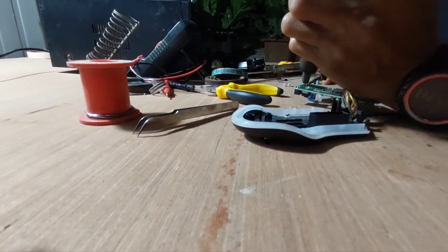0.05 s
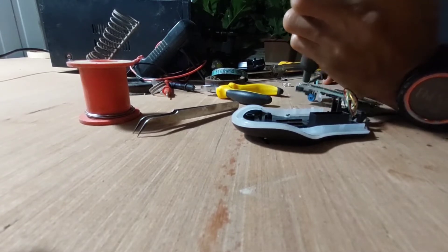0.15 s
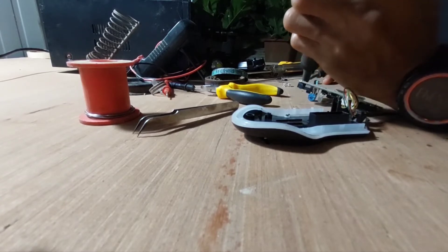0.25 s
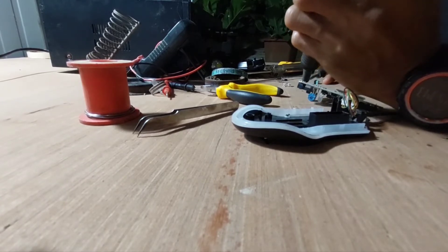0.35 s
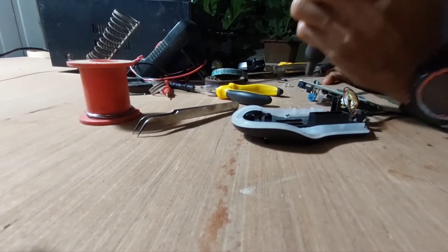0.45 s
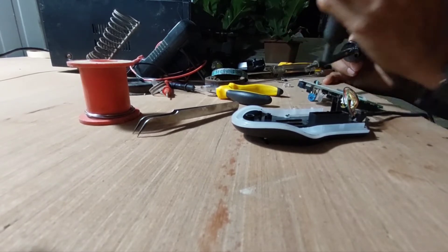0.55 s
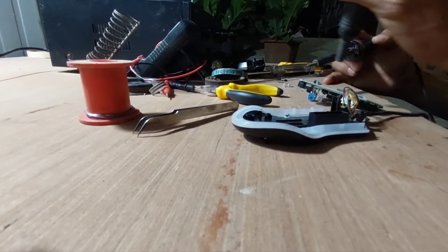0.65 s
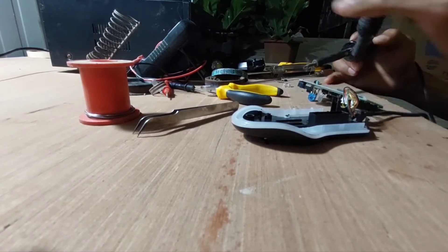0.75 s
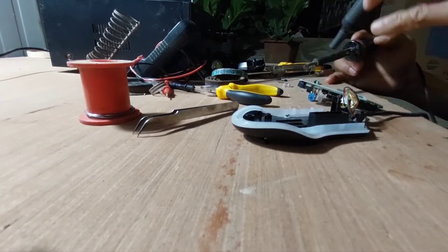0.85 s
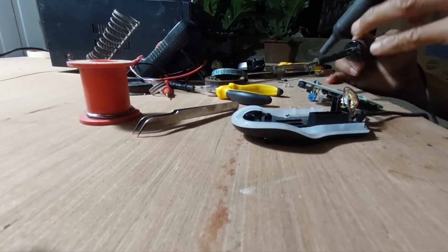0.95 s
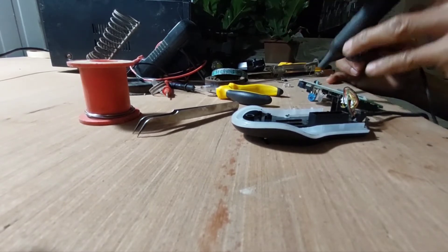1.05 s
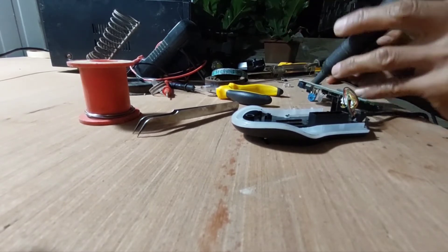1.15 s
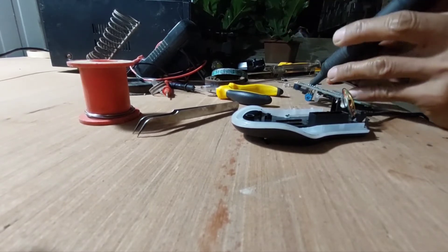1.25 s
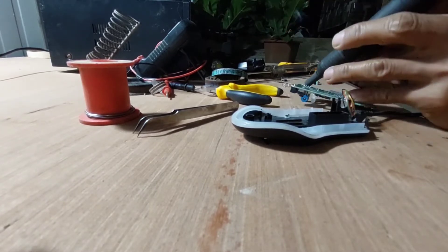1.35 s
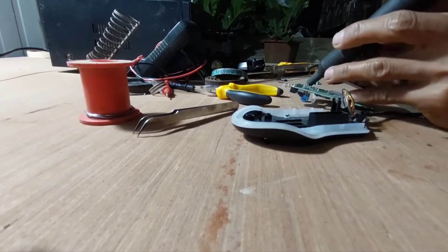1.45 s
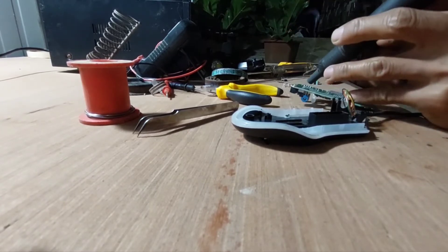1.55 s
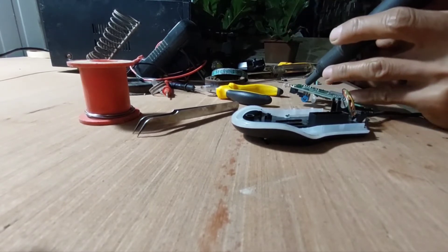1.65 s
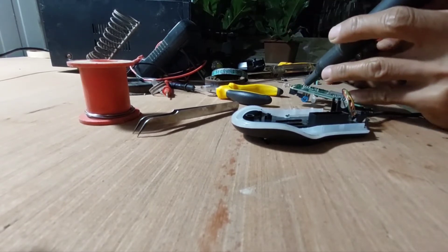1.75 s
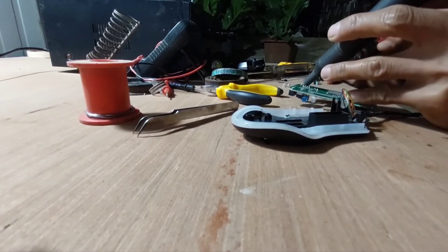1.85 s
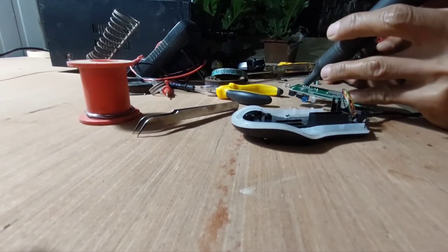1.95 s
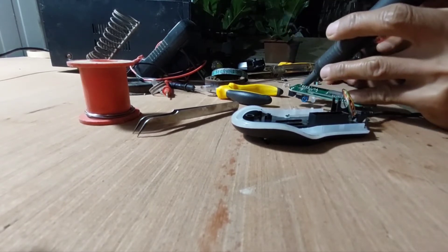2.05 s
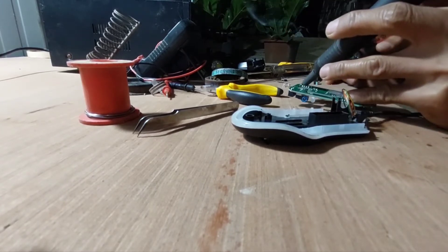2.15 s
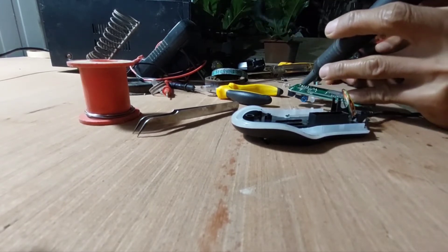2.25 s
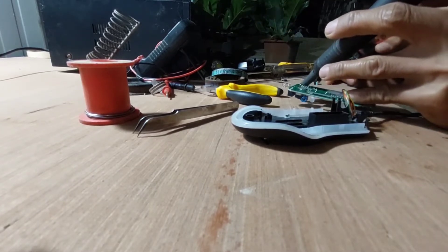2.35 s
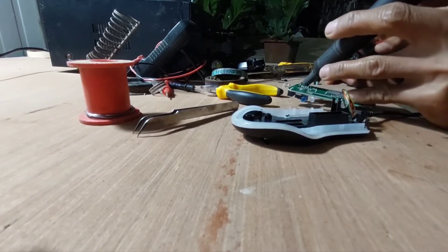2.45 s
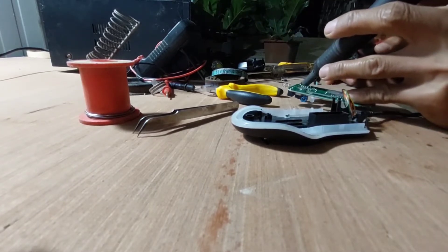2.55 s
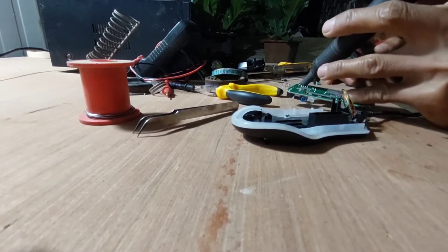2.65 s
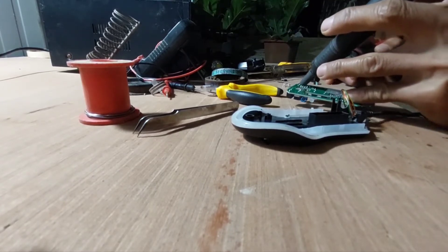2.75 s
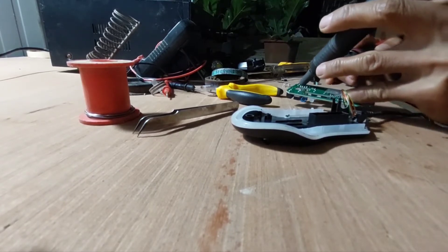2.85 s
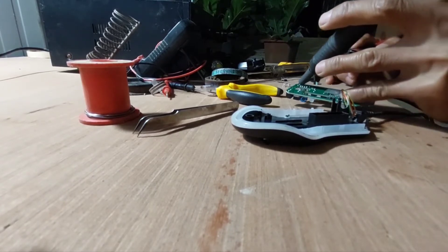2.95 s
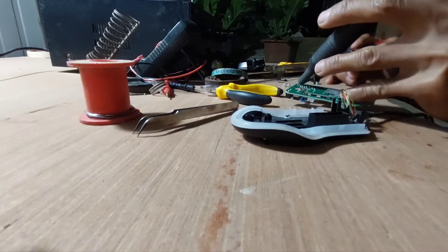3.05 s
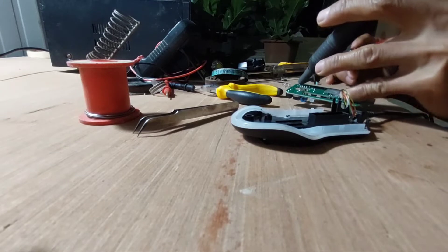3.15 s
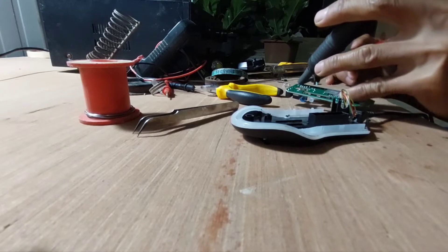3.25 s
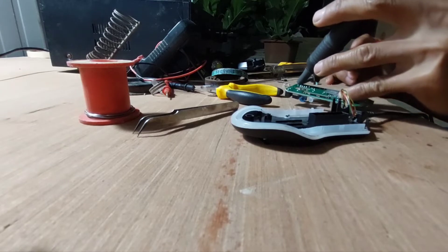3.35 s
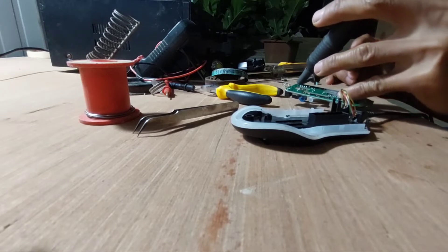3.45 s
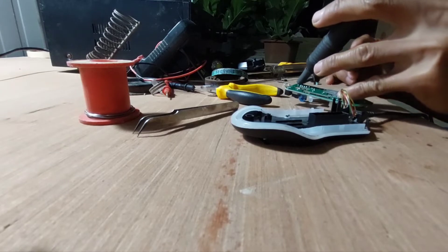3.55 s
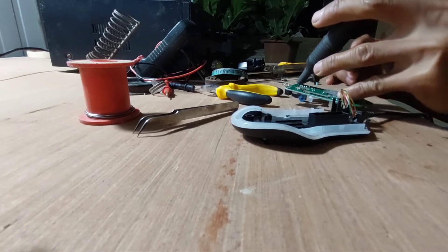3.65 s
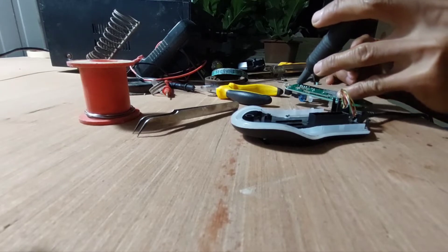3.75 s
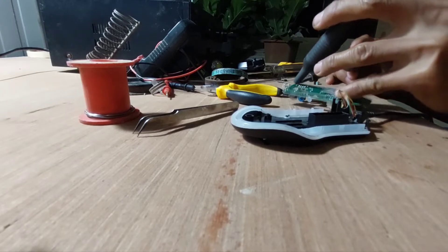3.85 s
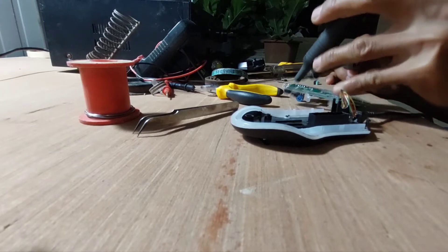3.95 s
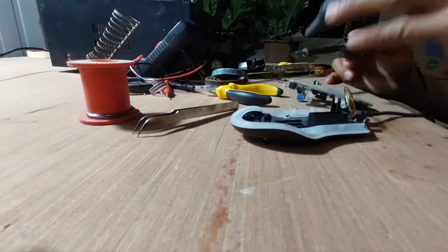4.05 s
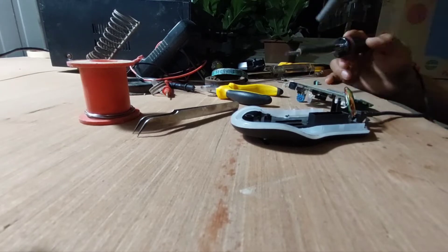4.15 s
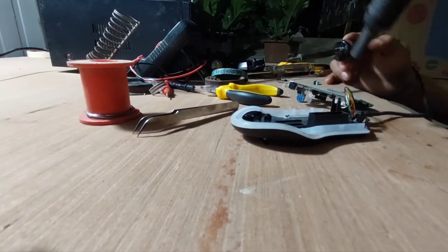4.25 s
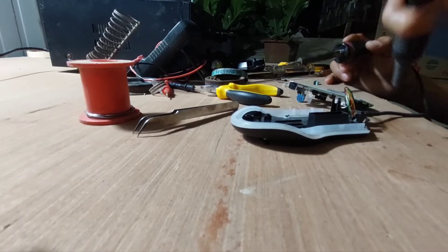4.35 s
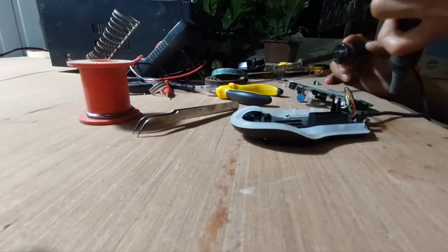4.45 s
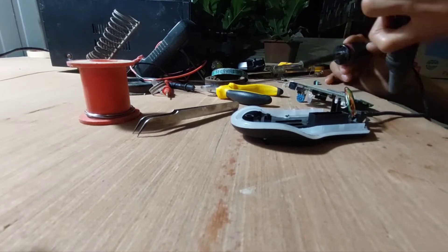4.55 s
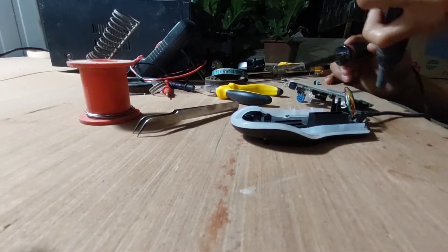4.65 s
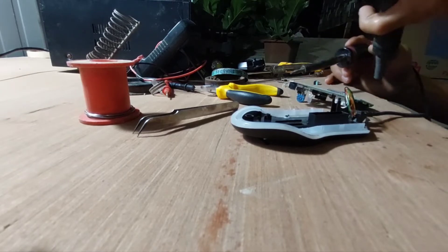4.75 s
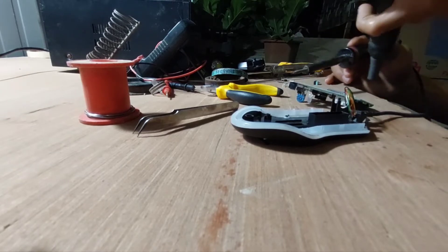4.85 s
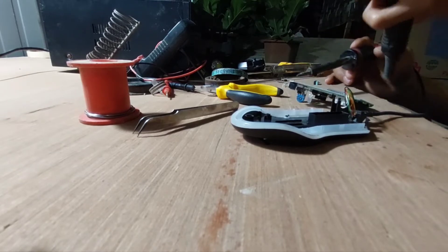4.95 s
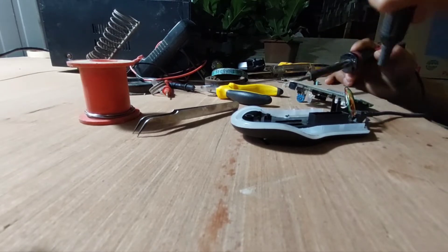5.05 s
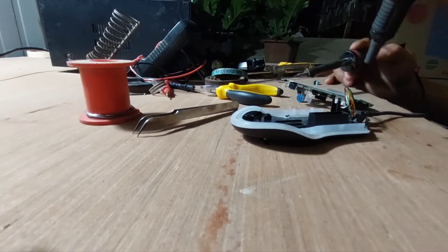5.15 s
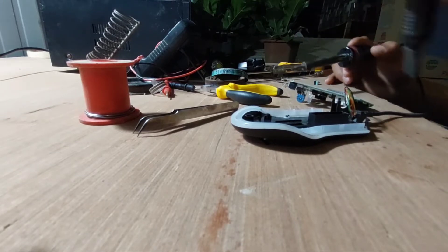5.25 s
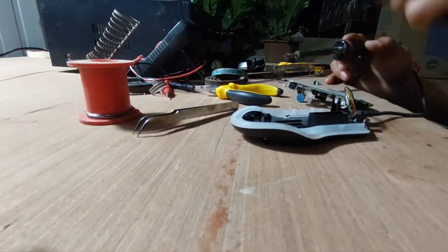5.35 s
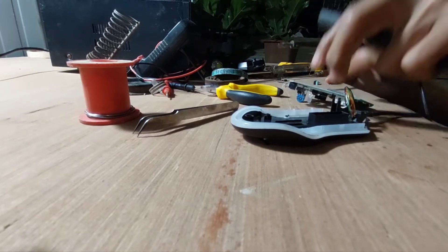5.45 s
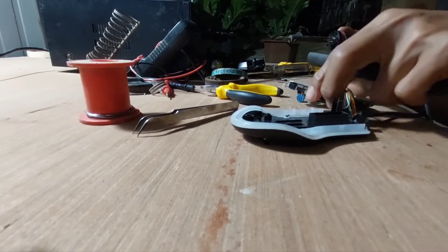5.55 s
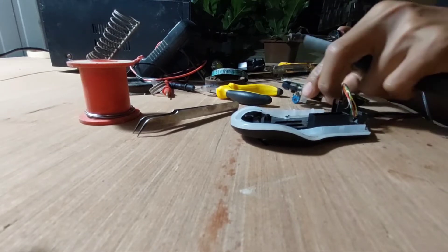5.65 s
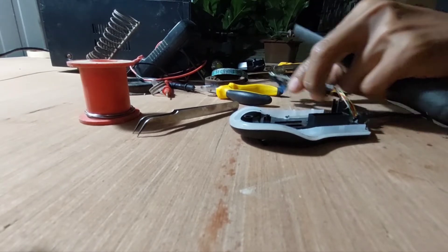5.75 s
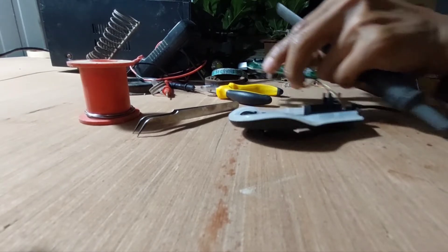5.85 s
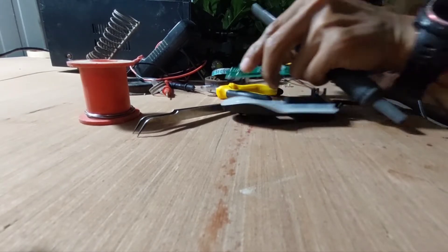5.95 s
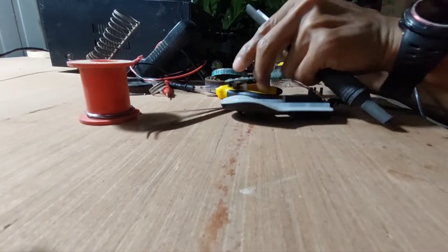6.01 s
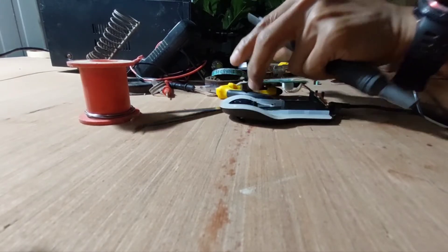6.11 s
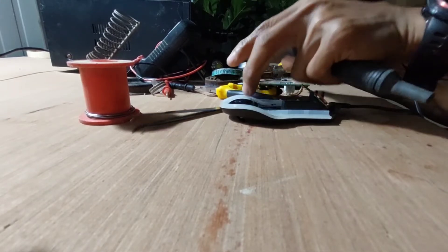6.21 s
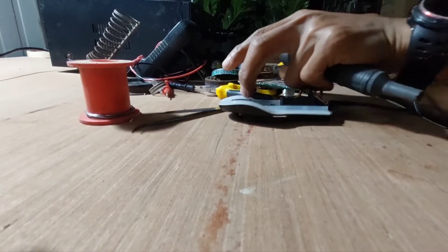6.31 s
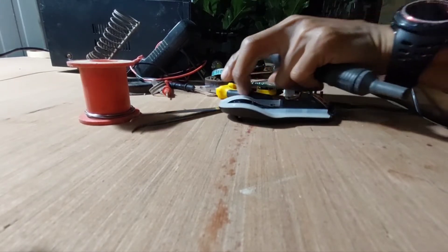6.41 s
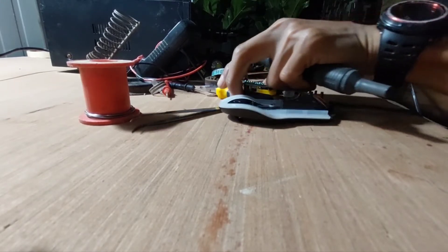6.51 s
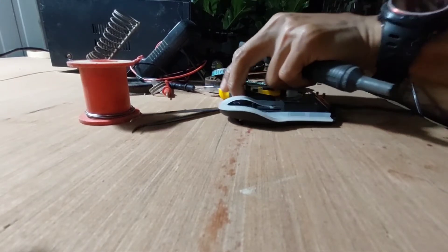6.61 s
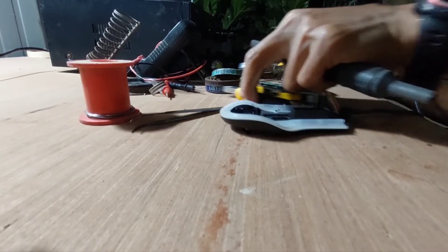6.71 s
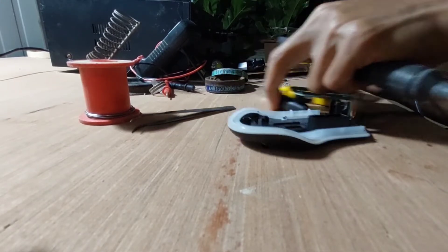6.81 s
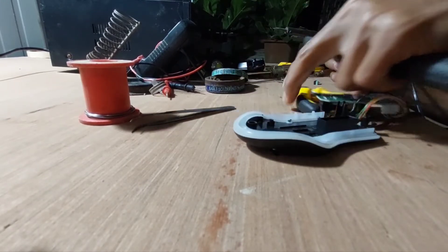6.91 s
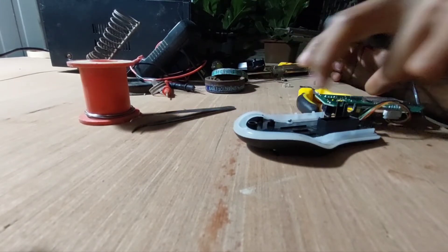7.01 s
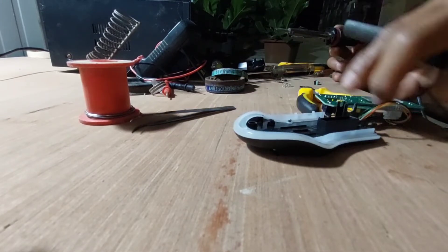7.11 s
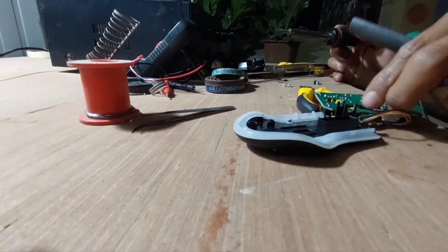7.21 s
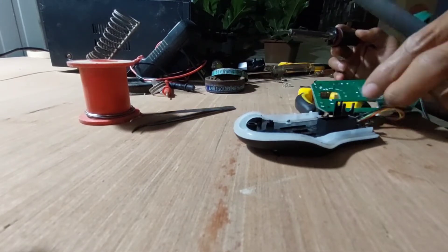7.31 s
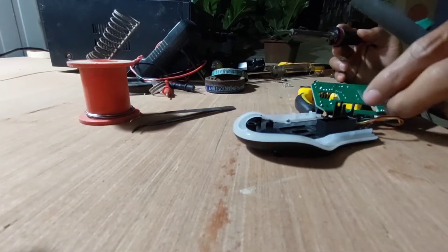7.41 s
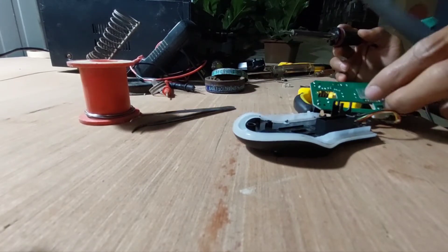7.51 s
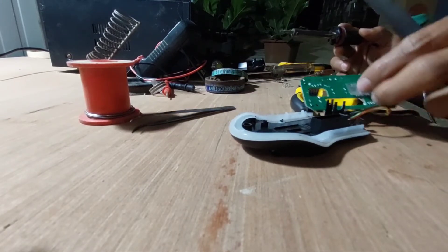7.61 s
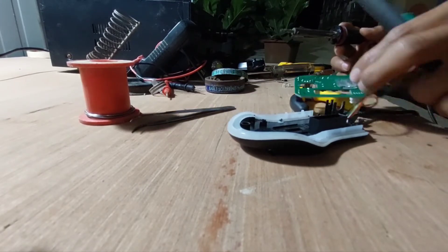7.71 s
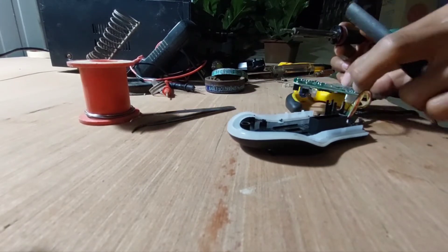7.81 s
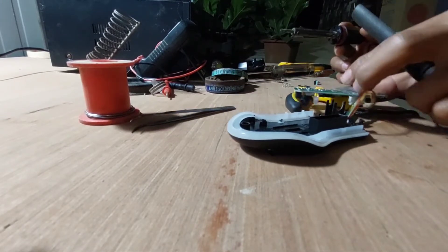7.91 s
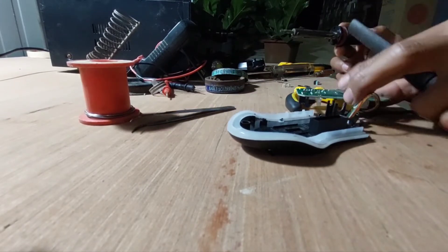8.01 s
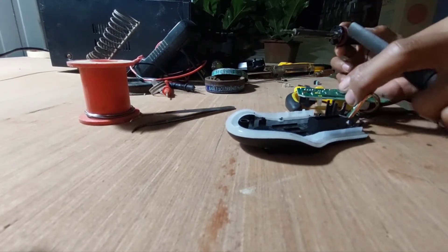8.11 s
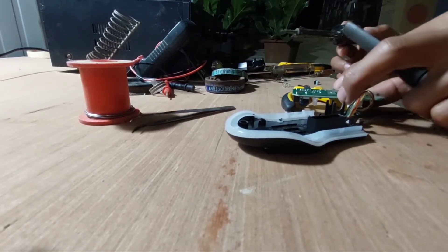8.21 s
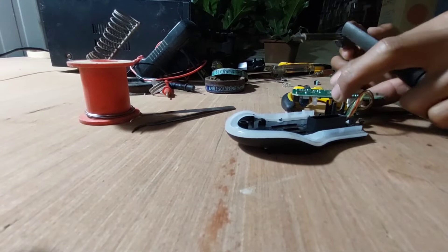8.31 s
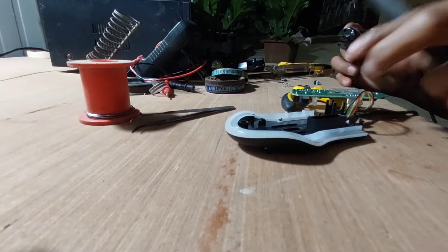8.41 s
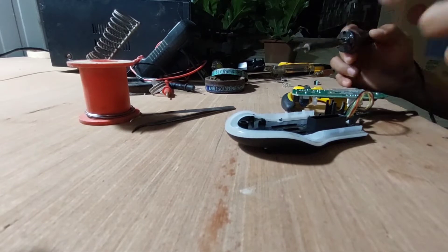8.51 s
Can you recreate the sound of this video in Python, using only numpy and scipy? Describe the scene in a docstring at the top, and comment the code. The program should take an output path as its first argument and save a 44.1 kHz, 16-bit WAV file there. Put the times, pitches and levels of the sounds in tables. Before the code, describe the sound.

Close, dry handling noises in a small-sounding room: light knocks of tools on wood, a long quiet pause, a sudden crack and rattle as something is set down, bright little clicks, then a dense clattering and rubbing of a plastic shell and board. Softer bumps end it. Night insects shimmer steadily in stereo over faint drones, and a distant putter of a small engine rises to a low throb.

```python
"""A wooden bench at night, with the microphone lying on it: tools, a plastic shell and a small board are
tapped, dropped and dragged. Blows and streams of tiny slips ring the bench and the parts, and a room answers.
Outside, a one-cylinder engine putters, grows louder and on the whole speeds up: a stack of multiples of its
firing rate. Insects in narrow bands and a far rumble are shaped noise; two faint drones are ringing noise."""
import sys
import numpy as np
from scipy import signal
from scipy.fft import rfft, irfft, next_fast_len
from scipy.io import wavfile
from scipy.ndimage import uniform_filter1d, map_coordinates

SR = 44100
rng = np.random.default_rng(int(sys.argv[2]) if len(sys.argv) > 2 else 0)


def bounce(signal):
    """Save signal as a 16-bit WAV file at the path given by the first command-line argument."""
    frames = np.transpose(np.atleast_2d(signal))
    limited = np.clip(frames, -1, 1)
    pcm = np.round(limited * 32767).astype(np.int16)
    wavfile.write(sys.argv[1], SR, pcm)


N = 377937  # length in samples

# Engine speed over time. Each row: time in seconds, firings per second.
FIRING_RATE = [(0, 16.6), (1.25, 17.0), (1.45, 17.5), (2.25, 17.45), (3.25, 18.05), (4.05, 18.2),
               (4.45, 18.5), (5.3, 18.55), (5.65, 19.55), (6.05, 19.6), (6.45, 20.95), (6.85, 23.05),
               (7.45, 23.6), (7.85, 22.4), (8.25, 22.7), (8.57, 23.5)]
# Engine gain over time. Each row: time in seconds, gain in dB.
ENGINE_GAIN = [(0, -73), (.7, -61.5), (1.3, -54), (2.7, -54), (3.5, -50.5), (5.8, -49.5), (6.4, -46),
               (8.57, -43)]
# Shape of one firing. Each row: multiple of the firing rate (a plain number), level in dB.
FIRING_SHAPE = [(2, 0.5), (3, -25), (4, -13.5), (5, -1.5), (9, -1.5)]
# Exhaust and walls colouring the firings. Each row: frequency in Hz, gain in dB.
EXHAUST_COLOUR = [(30, -29.5), (46, -15), (58, -11), (75, 12.5), (88, 3.5), (102, -10), (120, 5.5),
                  (142, 2.5), (162, -1.5), (172, -10), (200, -43.5), (400, -50)]
# Low insect bands. Each row: frequency in Hz, relative level in dB per Hz.
LOW_INSECTS = [(1000, -48.5), (1700, -36.5), (1990, -14.5), (2330, 5), (2470, 1), (2750, -14), (3010, -3.5),
               (3300, -1.5), (3440, -7), (3500, -27), (3770, -29.5), (4150, -27), (4550, -15.5),
               (5060, -4.5), (6100, -13.5), (7930, -38), (13400, -120)]
# High insect band and hiss. Each row: frequency in Hz, relative level in dB per Hz.
HIGH_INSECTS = [(3470, -29.5), (5900, -40), (6080, -11.5), (6500, -4), (6870, 0), (7930, -1.5), (8970, 3.5),
                (9550, -1.5), (11300, -12.5), (12900, -11), (13800, -13.5), (14800, -9), (15500, -20.5),
                (16200, -44)]
# Far traffic and air. Each row: frequency in Hz, relative level in dB per Hz.
FAR_RUMBLE = [(15, -49.5), (25, -21.5), (92, 0.5), (130, -9.5), (156, -2.5), (194, -17.5), (299, -24.5),
              (346, -14.5), (629, -28.5), (1320, -43.5), (1700, -44), (1900, -28.5), (2470, -79),
              (4180, -120)]
# Two faint narrow drones. Each row: frequency in Hz, width in Hz, relative level in dB.
DRONE_MODES = [(216, 14.3, -2.5), (295.1, 11.6, -3)]
# How alike left and right are in the noises of the night. Each row: frequency in Hz, likeness (1 is identical).
NIGHT_LIKENESS = [(60, 0.78), (240, 0.41), (950, 0.22), (3770, -0.059), (15000, -0.0052)]
# Balance of the night. Each row: frequency in Hz, left minus right in dB.
NIGHT_BALANCE = [(60, -2), (240, -4), (950, -6.5), (3770, -0.5), (15000, 3)]
# Contacts. Each row: start in seconds, base level in dB, then wood, small hard parts and steel in dB
# relative to the base, basic time for the rattle to fall 60 dB in seconds, left minus right in dB,
# favoured frequency in Hz.
CONTACTS = [(0.092, -47, -11, -14, -5, 0.12, 2, 790), (0.316, -28, -3.5, -27, -22, 0.17, 1, 454),
            (0.517, -56.5, 21, -16, -5, 0.022, -2, 585), (0.642, -52.5, -6, 4, -5, 0.13, -19, 557),
            (1.275, -33, 0.5, -24, -20, 0.09, -5, 634), (1.452, -35.5, -18, -10, -20, 0.11, 6, 1130),
            (1.501, -40, -1, -10, -20, 0.022, 4, 719), (1.637, -27.5, -5, -10, -23, 0.11, -0.5, 670),
            (2.172, -44, 3, -8, -10, 0.1, 0, 1310), (2.996, -50.5, -3, -2, 0, 0.074, -1, 1400),
            (3.964, -18.5, 1, 2.5, 1.5, 0.12, 2.5, 616), (3.971, -21.5, 9, -2, 10, 0.027, -4.5, 117),
            (3.982, -12.5, -19, 2, 4, 0.039, -1, 1010), (4.099, -32, -11, -10, -25, 0.03, -5, 1200),
            (4.11, -13.5, -5.5, -13, -30, 0.029, -1, 980), (4.19, -23, -3, -25, -32.5, 0.026, -2, 1100),
            (4.239, -38.5, 2, -14, -16, 0.032, 8, 900), (4.638, -49, -10, 15, -6, 0.074, 0, 740),
            (4.729, -33.5, -10, 12, 15.5, 0.062, 2.5, 1130), (4.82, -47.5, -7, 0, 0, 0.084, 2, 1700),
            (4.851, -49, -10, 2, -5, 0.036, 1, 1700), (4.873, -48.5, -6, 1, 6, 0.04, 1.5, 1520),
            (5.014, -46.5, -4, 12.5, 0, 0.12, 3, 3500), (5.186, -46.5, 3.5, 33, 31.5, 0.087, 1, 2570),
            (5.338, -47, 13, 20.5, 19, 0.023, 0, 306), (5.655, -33, -8, -16, -18, 0.03, -6, 740),
            (5.698, -25, -6, 1, -22, 0.028, -4, 942), (5.925, -44.5, -10, -6, -15, 0.089, -10, 1210),
            (5.99, -36, -3.5, -19, -17, 0.044, -6, 568), (6.061, -31.5, -2, -3, -14, 0.064, -0.5, 800),
            (6.096, -9, -9.5, -3.5, 0, 0.039, 4.5, 530), (6.141, -14.5, -9, 1.5, 6.5, 0.064, 3.5, 2420),
            (6.176, -12.5, -3, -9, -14, 0.17, 0, 457), (6.204, -20, -11, 7, 10.5, 0.067, 1, 2380),
            (6.249, -15, -9, 3.5, 9.5, 0.069, -2.5, 960), (6.284, -13.5, -24, -1.5, -7, 0.08, -0.5, 1060),
            (6.309, -29.5, -6, 5, 2, 0.047, -2, 912), (6.716, -50, -3, 9, 2, 0.03, 0, 2500),
            (6.878, -27.5, 6, -6, -28, 0.021, 0, 328), (7.042, -23, 6, -20, -20, 0.084, -3, 606),
            (7.067, -17, 4, -14, -14, 0.058, -2.5, 852), (7.091, -19.5, 5.5, -27, -14, 0.05, -1, 680),
            (7.355, -34.5, -15, -1, -11, 0.03, 0.5, 1200), (7.457, -32.5, -15, -4, -12, 0.14, 2, 620),
            (7.601, -39.5, -4, 4.5, -5, 0.044, 0, 736), (7.695, -40.5, -8, -9, -10, 0.17, -6, 549),
            (7.867, -27.5, 0.5, -27, -26, 0.049, 3, 1070), (7.918, -21, 0, -28, -26.5, 0.056, -2.5, 596),
            (7.95, -43.5, 16, -15, -12, 0.048, -3, 350), (8.034, -23, 11, -10, -22, 0.035, 1.5, 298),
            (8.057, -41, 13, -15, -10, 0.057, -3, 300), (8.313, -39.5, 0, -11, -10, 0.041, -5, 576)]
# Drags over the wood. Each row: start in seconds, rise in seconds, hold in seconds, shell level in dB,
# wood relative to shell in dB, grit relative to shell in dB.
SLIDES = [(0.491, 0.01, 0.15, -64, 7, -19), (1.278, .02, 0.067, -57, 5, -25),
          (1.301, .12, 0.066, -49, -2.5, -21), (3.988, 0.0092, 0.018, -37, -1, -16),
          (4.075, 0.018, 0.025, -39, 3.5, -11), (4.182, 0.0047, 0.033, -46, 4.5, -22),
          (5.636, 0.018, 0.028, -42, 6.5, -10), (5.687, 0.02, 0.0076, -28, -12, -4.5),
          (5.847, 0.08, 0.19, -55, 2, -4), (6.08, 0.036, 0.2, -34.5, -3.5, -28),
          (6.524, 0.027, 0.048, -59.5, 8, -10), (6.633, .015, 0.095, -50, -5, -10),
          (6.6, 0.19, 0.23, -39, -2, -12.5), (6.798, 0.13, 0.071, -45, 7.5, -1),
          (7.028, 0.011, 0.047, -41.5, 8.5, -19.5), (7.323, 0.022, 0.16, -51.5, 3, -16),
          (7.54, 0.043, 0.079, -56.5, 8, -12), (7.673, 0.075, 0.075, -50, 7.5, -9),
          (7.917, .008, 0.026, -45, -6, -22), (8.04, 0.011, 0.059, -55, 19, -38),
          (8.125, .03, .03, -54.5, 2, -4), (8.24, 0.067, 0.032, -52.5, 13, -20)]
# How fast a drag dies in each body, in dB per second: frame, table top, shell, hard parts, steel.
DRAG_RELEASE = [250, 270, 343, 443, 500]
# Ringing of the bench frame. Each row: frequency in Hz, width in Hz, relative level in dB.
FRAME_MODES = [(70, 44, -6.5), (95, 34, 2.5), (117, 21, 6), (169.7, 14, -2.5)]
# Ringing of the table top. Each row: frequency in Hz, width in Hz, relative level in dB.
TABLE_TOP_MODES = [(197, 45, 4), (248, 45, 1.5), (264.6, 14.7, 0), (342.6, 78, -7.5), (416, 54, -9.5),
                   (311, 175, -4.5)]
# Ringing of the plastic shell and board. Each row: frequency in Hz, width in Hz, relative level in dB.
SHELL_MODES = [(398, 330, -0.5), (542, 250, 10), (665, 120, -9), (654, 23, -2), (795, 236, 5.5),
               (914, 56, 8.5), (1061, 98, 5), (1230, 141, 2.5), (1460, 270, -4), (1994, 580, -5.5)]
# Ringing of small hard parts. Each row: frequency in Hz, width in Hz, relative level in dB.
HARD_PART_MODES = [(1960, 770, -10), (2600, 640, -7.5), (3225, 440, -10), (3710, 500, -12.5),
                   (4560, 560, -15)]
# Colour of steel edges. Each row: frequency in Hz, relative level in dB per Hz.
STEEL_COLOUR = [(2650, -20), (4500, -6.5), (5800, -1), (7150, -4.5), (7710, -3.5), (8540, 2), (9620, -4),
                (13700, -2), (15100, -10), (16300, -17)]
# Ports facing the work. Each row: frequency in Hz, left minus right in dB.
WORK_BALANCE = [(60, -28), (125, 9.5), (300, 0), (1500, -4), (4000, 0), (12000, 0.5)]
# Dying of the room's answer. Each row: frequency in Hz, time to fall 60 dB in seconds.
ROOM_DECAY = [(150, 0.48), (1000, 0.21), (8000, 0.25)]

LOW_INSECTS_DB, HIGH_INSECTS_DB, RUMBLE_DB, DRONE_DB = -55, -49.5, -55.5, -60
FRAME_DB, FRAME_FOLLOWS = -9.5, 0.9  # the frame under the table top takes a share of a blow on the wood
RISE_DB, SLIDE_FRAME_DB = 28.5, -6.5  # a drag swells by this much; frame relative to table top
ROOM_DB = -11.0
PORT_DELAY_S = 0.000191  # how much later the work reaches the left
TOP_HZ = 16300  # nothing is kept above this


def amp(db):
    """Turn decibels into a plain gain."""
    return 10 ** (np.asarray(db) / 20)


def unit(x):
    """Scale to an average strength (rms) of 1."""
    return x / np.sqrt(np.mean(x ** 2) + 1e-20)


def along(points, hz):
    """Read between (Hz, value) points on a log frequency axis."""
    f, v = np.transpose(points)
    return np.interp(np.log(hz + 1), np.log(f + 1), v)


def curves(rows):
    """Give one value per sample for each column after the time."""
    s, *cols = np.transpose(rows)
    return [np.interp(np.arange(N) / SR, s, c) for c in cols]


def wobble(rate):
    """Draw a smooth random curve with this many random points a second."""
    at = np.arange(0, N + 16, 16)  # every 16th sample is enough
    knots = rng.standard_normal(int(N * rate / SR) + 4)
    return np.interp(np.arange(N), at, map_coordinates(knots, [at * rate / SR]))


def filtered(x, response):
    """Pass sound through a response given as a function of frequency."""
    m = next_fast_len(N + SR // 2)
    return irfft(rfft(x, m) * response(np.fft.rfftfreq(m, 1 / SR)), m)[..., :N]


def balance(points, hz):
    """Split a left-minus-right level evenly into a left and a right gain."""
    return amp(along(points, hz) * [[.5], [-.5]])


def modes(table):
    """A body rings at a few frequencies and passes little far from them; average power gain 1."""
    low, high = table[0][0] * 0.84, table[-1][0] * 2.7

    def response(f):
        ring = 0
        for k, (centre, width, db) in enumerate(table):
            resonance = 1j * f * width / (centre * centre - f * f + 1j * f * width)
            ring = ring + (-1) ** k * amp(db) * resonance
        skirt = (1j * f / low / (1 + 1j * f / low)) ** 2 / (1 + 1j * f / high) ** 2
        shaped = ring * skirt
        return shaped / np.sqrt(np.mean(abs(shaped) ** 2))
    return response


def colour(points):
    """A smooth colour without separate rings; average power gain 1."""
    return lambda f: unit(amp(along(points, f)))


def half_turn(alike):
    """Angle that mixes two separate noises into a left and right of this likeness."""
    return np.arccos(np.clip(alike, -1, 1)) / 2


def pair(count, alike):
    """Make left and right white noise of a given likeness."""
    a, b = rng.standard_normal((2, count))
    turn = half_turn(alike)
    return np.cos(turn) * a + np.sin(turn) * np.array([b, -b])


def rush(spectrum, patchy_db):
    """Coloured stereo noise whose gain varies in random patches of time and pitch."""
    z = signal.stft(rng.standard_normal((2, N)), nperseg=512)[2]
    patches = uniform_filter1d(rng.standard_normal(z.shape[1:]), 5, 0)
    patches = unit(uniform_filter1d(patches, 10, 1))
    noise = signal.istft(z * amp(patchy_db * patches), nperseg=512)[1][:, :N]

    def mid_side(hz):
        turn = half_turn(along(NIGHT_LIKENESS, hz))
        return amp(along(spectrum, hz)) * [np.cos(turn), np.sin(turn)]
    mid, side = filtered(noise, mid_side)
    return np.array([mid + side, mid - side]) / np.sqrt(np.mean(mid ** 2))


def engine():
    """Multiples of the firing rate, coloured by the exhaust; each fades and drifts on its way here."""
    rate_hz, = curves(FIRING_RATE)
    gain_db, = curves(ENGINE_GAIN)
    turns = np.cumsum(rate_hz * (1 + 0.0035 * wobble(6))) / SR
    tone = 0
    for k in range(2, 11):
        gain = amp(along(EXHAUST_COLOUR, k * rate_hz) + along(FIRING_SHAPE, k) + 1.83 * wobble(2.423))
        drift = 1.65 * wobble(0.615) + np.array([[-.15], [.15]])  # radians, left and right
        tone = tone + gain * np.cos(2 * np.pi * k * turns + drift)
    return amp(gain_db) * tone


def insects():
    """Narrow bands of noise, low and high, each gently changing in level."""
    low = amp(LOW_INSECTS_DB + 0.52 * wobble(2.5)) * rush(LOW_INSECTS, patchy_db=2.0)
    high = amp(HIGH_INSECTS_DB + 0.81 * wobble(3.5)) * rush(HIGH_INSECTS, patchy_db=0.86)
    return low + high


def rumble():
    """Far traffic and air: mostly low noise with an uneven level."""
    return amp(RUMBLE_DB + 2.4 * wobble(1.6)) * rush(FAR_RUMBLE, patchy_db=3.5)


def drones():
    """Steady noise ringing two narrow resonances."""
    return amp(DRONE_DB) * filtered(pair(N, 0.69), modes(DRONE_MODES))


def night():
    """All the background sounds, heard unevenly by the two ports."""
    background = insects() + rumble() + drones() + engine()
    return filtered(background, lambda hz: balance(NIGHT_BALANCE, hz))


def struck_spot(hz, favoured_hz):
    """Each spot favours other frequencies, with one broad peak on top."""
    uneven = np.c_[np.geomspace(50, 2e4, num=40), rng.standard_normal(size=40)]
    peak = 1 + 0.96 * np.exp(-np.log((hz + 1) / favoured_hz) ** 2 / 0.035)
    return amp(3.6 * along(uneven, hz)) * peak


def hits(bodies):
    """A blow and a ragged dying rattle ring frame, table top, shell, hard parts and steel."""
    sound = np.zeros((2, N + SR))
    t = np.arange(2 ** 13) / SR
    lead = 128  # samples kept before the blow, as the spot's colour also spreads backwards
    hz = np.fft.rfftfreq(len(t), 1 / SR)
    fade = np.clip(3 - 3 * t / t[-1], 0, 1)  # every ring is over within 0.2 s
    answers = [body(hz) for body in bodies]
    for s, db, wood_db, hard_db, steel_db, t60, pan_db, favoured_hz in CONTACTS:
        side = amp(np.array([[pan_db], [-pan_db]]) / 2)
        spot = struck_spot(hz, favoured_hz)
        knots = rng.standard_normal(size=75)
        ragged = amp(2.46 * np.interp(t, np.linspace(0, t[-1], num=75), knots))  # loose parts chatter
        # Each row: level in dB, share of the fall time, left-right likeness, strength of the blow.
        # Heavy bodies feel mostly the blow.
        parts = [(FRAME_DB + FRAME_FOLLOWS * wood_db, .6, .97, 14),
                 (wood_db, 1.2, .93, 12),
                 (1.5, 1.03, 0.5, 8.5),
                 (hard_db, .8, .55, 3.5),
                 (steel_db, .6, .5, 1.2)]
        for answer, (part_db, share, alike, blow) in zip(answers, parts):
            dying = amp(-60 * t / (abs(t60) * share + 0.016))
            force = ragged * dying * pair(len(t), alike)
            force *= 1 + amp(-60 * t / 0.027)  # the first milliseconds are the hardest
            force[:, 0] -= blow
            ring = np.roll(irfft(rfft(force) * answer * spot), lead, axis=1) * fade
            start = round(s * SR) - lead
            sound[:, start:][:, :len(t)] += amp(db + part_db) * side * ring / abs(ring).max()
    return sound[:, :N]


def drags():
    """A dense stream of tiny slips pushes the same bodies: each drag swells, holds and dies."""
    force = np.zeros((5, N))
    for s, rise, hold, db, wood_db, grit_db in SLIDES:
        span = slice(round(s * SR), round((s + rise + hold + .5) * SR))
        t = np.arange(N)[span] / SR - s - rise  # zero where the hold begins
        release_db = np.outer(DRAG_RELEASE, np.maximum(t - hold, 0))
        swell_db = RISE_DB * np.minimum(t / rise, 0) - release_db
        part_db = np.c_[[wood_db + SLIDE_FRAME_DB, wood_db, 0, grit_db, grit_db]]
        force[:, span] += amp(db + part_db + swell_db)
    slips = amp(0.72 * wobble(60) + 2.34 * wobble(500))
    pushes = []
    for alike in (1.0, 0.84, 0.36, 0.1, 0.57):  # left-right likeness in each body
        catch = unit(slips * amp(1.06 * wobble(45)))  # each body also catches in its own time
        pushes.append(catch * pair(N, alike))
    return force[:, None] * np.array(pushes)


def room(x):
    """A noise-like echo tail in which each frequency dies at its own speed."""
    hz, t, z = signal.stft(rng.standard_normal((2, SR // 2)), SR, nperseg=256)
    dying = amp(-60 * t / along(ROOM_DECAY, hz)[:, None])
    tail = signal.istft(z * dying, SR, nperseg=256)[1]
    late = np.pad(x, ((0, 0), (300, 0)))  # the answer starts 300 samples later
    return signal.fftconvolve(late, tail / np.linalg.norm(tail[0]), axes=1)[:, :N]


def at_ports(hz):
    """Hands work right of the ports, so the left hears the work later and in another balance."""
    arrival = np.exp(1j * np.pi * hz * PORT_DELAY_S * np.array([[-1], [1]]))
    return balance(WORK_BALANCE, hz) * arrival


def scene():
    """Forces ring their bodies, the room answers, the night lies under it."""
    background = night()
    bodies = [modes(FRAME_MODES), modes(TABLE_TOP_MODES), modes(SHELL_MODES),
              modes(HARD_PART_MODES), colour(STEEL_COLOUR)]
    work = hits(bodies)
    for push, body in zip(drags(), bodies):
        work = work + filtered(push, body)
    work = filtered(work, at_ports)
    return work + amp(ROOM_DB) * room(work) + background


def record(dry):
    """The input rounds off the loudest peaks; nothing is kept above the band limit."""
    top = .95  # the level that peaks bend towards
    rounded = dry / (1 + abs(dry / top) ** 4) ** (1 / 4)
    return filtered(rounded, lambda hz: hz < TOP_HZ)


dry = scene()
out = record(dry)
bounce(out)
```